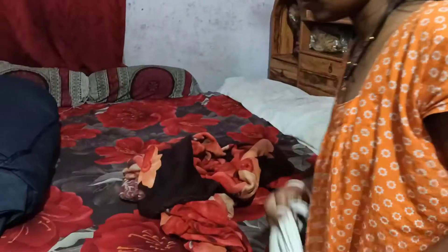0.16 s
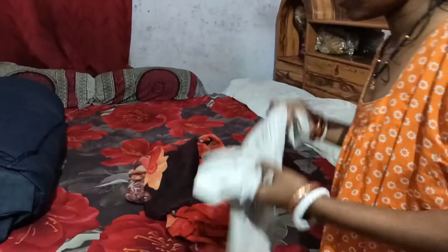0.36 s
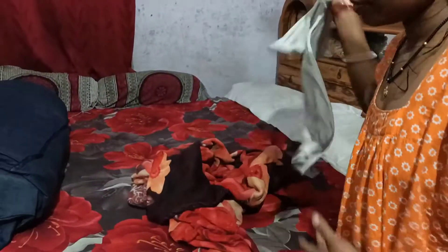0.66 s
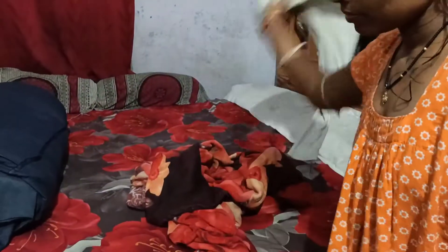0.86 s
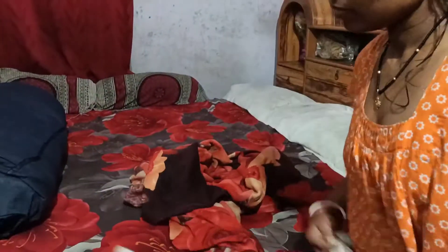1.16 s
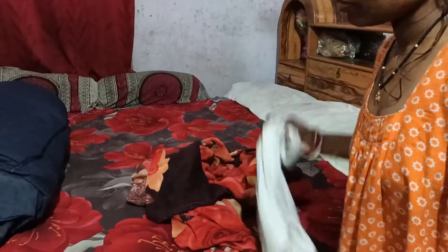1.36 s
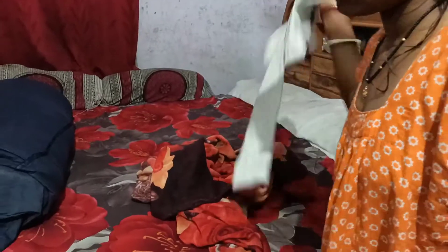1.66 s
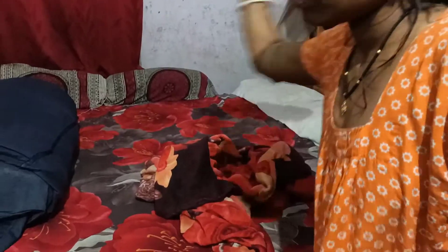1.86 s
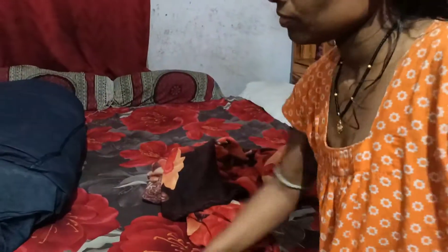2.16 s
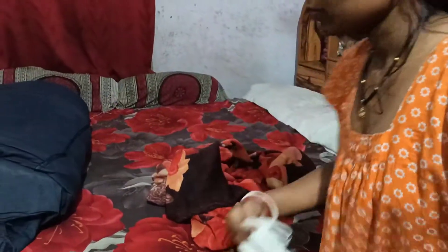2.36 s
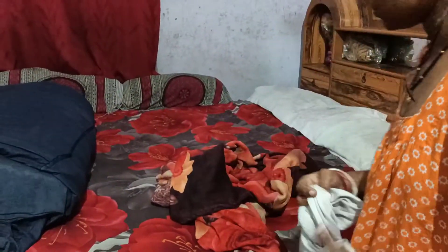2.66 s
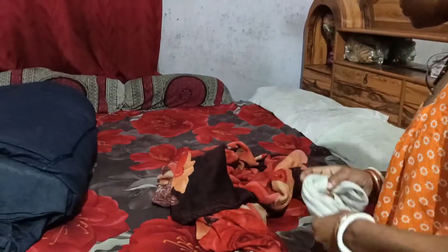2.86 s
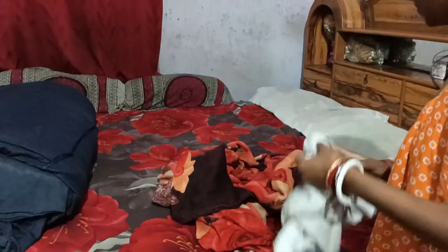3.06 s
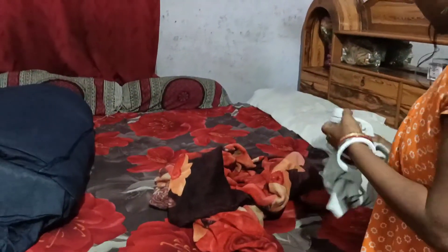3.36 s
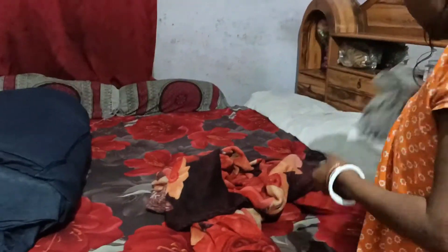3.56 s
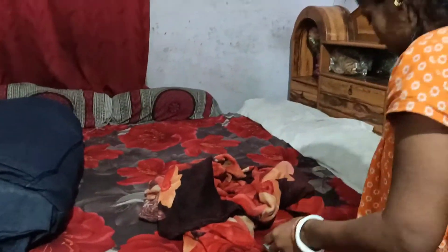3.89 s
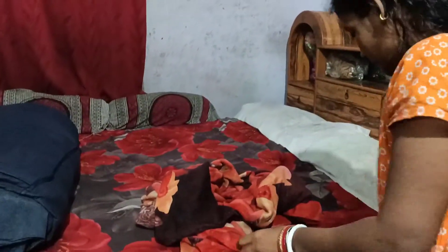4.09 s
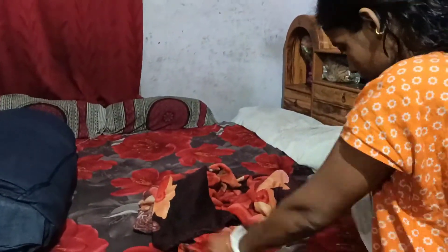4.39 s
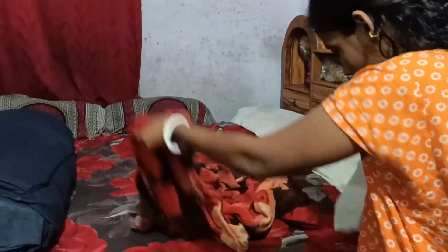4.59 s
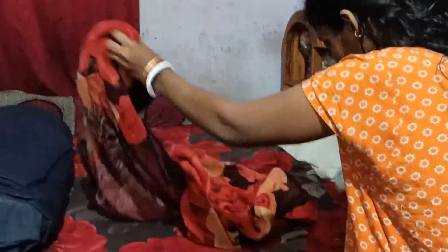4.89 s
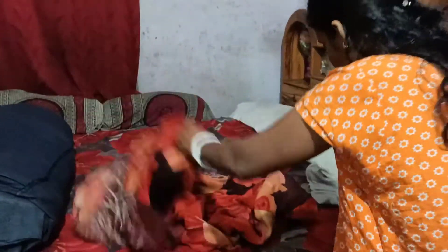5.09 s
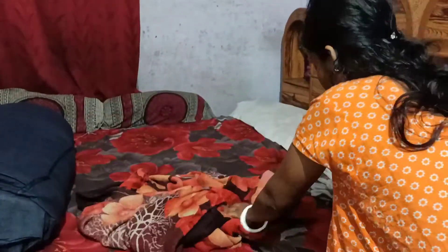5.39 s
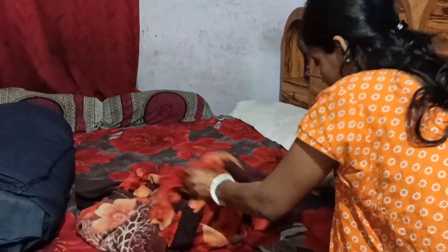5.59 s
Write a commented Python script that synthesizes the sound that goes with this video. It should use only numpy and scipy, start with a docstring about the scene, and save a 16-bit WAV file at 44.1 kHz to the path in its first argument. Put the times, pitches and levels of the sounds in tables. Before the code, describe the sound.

Cloth is snapped out three times with dull airy thumps, while bangles clink dryly on a wrist in a small, quiet bedroom.

```python
"""A push of air thumps as cloth is snapped out, then bangles of metal and shell clink on a wrist.
The cloth is snapped again and dropped on a bed in a small bedroom; it rustles, a far animal calls, the street hums.
Knocks are clicks into ringing modes, pushes of air are band-passed clicks that also ring the low room modes,
hum and rustle are banded noise, calls are a few harmonics; diffuse reflections are decaying noise.
Two microphone ports, each with treble resonances of its own."""
import sys
import numpy as np
from scipy import signal
from scipy.io import wavfile

SR = 44100
rng = np.random.default_rng(int(sys.argv[2]) if len(sys.argv) > 2 else 0)


def store_wav(level_fs):
    """Save 16-bit WAV to argv[1]."""
    pcm = np.round(np.clip(np.atleast_2d(level_fs), -1, 1) * 32767)
    wavfile.write(sys.argv[1], SR, pcm.T.astype(np.int16))


def boost_factor(decibels):
    """Convert a level in decibels to a linear amplitude factor."""
    exponent = np.asarray(decibels, float) / 20
    return 10 ** exponent


N = 253134  # samples

# edges of the noise bands, half an octave apart: (frequency [Hz])
NOISE_EDGES_HZ = 25 * 2 ** np.arange(0, 9.6, .5)
# correlation of the left and right noise: (frequency [Hz], correlation [-1..1])
LEFT_RIGHT_LIKENESS = [(60, 0.89), (130, 1), (290, 0.69), (640, 0.63), (1410, -.1), (3100, -0.28),
                       (15000, -0.61)]

# street hum spectrum: (frequency [Hz], relative density [dB])
HUM_SPECTRUM = [(15, -53), (25, -19.5), (92, 1), (217, -15.5), (293, -4.5), (373, -13.5), (405, -2),
                (624, -29), (1040, -20), (3920, -35.5), (4370, -41.5), (7110, -37), (7920, -51),
                (9570, -42), (16000, -68)]
# background level, heard to rise and dip: (time [s], level [dB])
BACKGROUND_LEVEL = [(0.0, -39), (0.17, -58), (0.67, -62.5), (0.97, -65.5), (1.23, -53.5), (1.49, -61),
                    (1.69, -63.5), (2.01, -65.5), (2.43, -56), (2.67, -67), (2.86, -62.5), (3.36, -61.5),
                    (3.68, -65), (4.3, -61), (5.2, -61.5), (5.35, -65), (5.61, -63), (5.74, -63)]
# low flapping of the cloth after each push of air; level relative to the boom
FLAP_DB, FLAP_T60_S, FLAP_RISE_S = -18, 0.28, 0.035

# far animal calls: (start [s], length [s], mid-call pitch [Hz], relative level [dB])
FAR_CALLS = [(1.95, 0.15, 230, -77), (2.85, .19, 226, -73.5), (5.55, 0.13, 230.6, -75.5)]
# harmonics of a call that carry: (multiple of the pitch, relative level [dB])
CALL_HARMONICS = [(2, -2), (3, -18), (4, 8), (5, -1), (6, -10), (9, -14.5), (10, -14.5)]
CALL_EDGE_S, CALL_SAG_HZ_PER_S, CALL_WOBBLE_HZ = 0.019, 16, 6.0

# cloth rustle spectrum: (frequency [Hz], relative density [dB])
RUSTLE_SPECTRUM = [(700, -24.5), (1500, -7), (2500, 1), (4000, -6.5), (8000, -1), (15500, 2)]
# cloth rustle in time: (time [s], level [dB])
RUSTLE_LEVEL = [(0, -62), (.16, -37), (.28, -86), (.52, -81), (.64, -92.5), (2.15, -89.5), (2.3, -58.5),
                (2.4, -73), (2.46, -47.5), (2.6, -95), (3.07, -85), (3.39, -72.5), (3.6, -88), (4.02, -77),
                (4.1, -46.5), (4.28, -62), (4.5, -66.5), (5.13, -68.5), (5.3, -89), (5.74, -95)]

# standing waves of the room: (frequency [Hz], relative level [dB], t60 [s])
ROOM_MODES = [(50.8, -8.5, 0.38), (132.7, -5.5, 0.18), (264, -7.5, 0.23), (321.8, -0.5, 0.13),
              (434.7, -9, 0.28), (549.4, -15, 0.25)]
# decay of the diffuse reflections: (frequency [Hz], t60 [s])
ROOM_T60 = [(40, 0.89), (280, 0.29), (740, 0.36), (1940, .28), (5120, 0.25), (13500, 0.19)]
# colour of the diffuse reflections: (frequency [Hz], relative level [dB])
ROOM_COLOUR = [(300, 12.5), (650, 1), (900, -0.5), (1300, 3.5), (2500, -4), (4000, -6), (8000, -2),
               (15000, -7.5)]

# air pushed by the cloth, relative levels:
# (time [s], boom [dB], thump [dB], snap [dB], hiss [dB])
PUFFS = [(.001, -20.5, -20.5, -19.5, -26.5), (0.061, -58, -63, -46, -55), (.44, -59, -58.5, -54.5, -67),
         (1.113, -56, -24.5, -23.5, -29), (1.1212, -23, -17, -12, -17), (1.129, -26, -22, -43, -36),
         (1.194, -32, -35.5, -32.5, -66), (1.475, -52, -49.5, -50, -68), (1.58, -58.5, -58, -54.5, -76.5),
         (2.237, -24.5, -25.5, -21.5, -20.5), (2.2524, -19.5, -11, -11, -30),
         (2.262, -24.5, -23, -33, -24.5), (2.46, -56, -48.5, -47.5, -60), (2.549, -53, -69, -65, -71),
         (4.086, -45, -44, -35.5, -38), (4.109, -45.5, -47.5, -58, -35), (4.137, -37, -36, -42, -65),
         (4.147, -35.5, -42, -60, -50), (4.382, -65.5, -65, -74, -64), (5.196, -65, -79, -69, -79.5)]
# edges of the boom, thump, snap and hiss bands: (frequency [Hz])
PUFF_EDGES_HZ = [30, 200, 700, 3500, 15000]

# ring modes of each bangle: (frequency [Hz], relative level [dB], t60 [s])
FIRST_METAL_MODES = [(3500, -8.5, 0.2), (5830, -5, 0.18), (8350, -4.5, 0.11), (10200, 5, 0.12),
                     (13610, 4.5, .18)]
SECOND_METAL_MODES = [(2870, -16.5, 0.077), (4420, -14.5, 0.15), (6725, -9, .15), (9090, 0, 0.084),
                      (12800, -14.5, .15), (15100, -1, .18)]
SHELL_MODES = [(2760, -32, 0.015), (4260, -30, 0.017), (5260, -28, 0.025), (6960, -19, 0.015),
               (8040, -19, 0.014), (9430, -15, 0.022), (9670, -24.5, 0.091), (9930, -17, 0.022),
               (11680, -14.5, 0.017), (12600, -17.5, 0.016), (14400, -20, .02)]
# bangles knocking together: (time [s], relative level [dB], lean to the left [dB])
KNOCKS = [(.0754, -40.5, -5.5), (0.1113, -24, -1), (.1393, -28.5, 0), (.183, -20, 2.5), (0.511, -61, -6),
          (1.0932, -37.5, 5), (1.1071, -18.5, -4.5), (1.3086, -46.5, -7), (1.3283, -56, 7),
          (1.475, -68, -7), (2.0505, -49.5, 0), (2.173, -40, 3.5), (2.2158, -17, 2), (2.4175, -32, -5.5),
          (2.439, -37.5, -1), (2.46, -42, -2), (2.4789, -27.5, -3), (2.5273, -36, 6), (2.8774, -47.5, -5),
          (2.9013, -45, -2), (3.1117, -59.5, -0.5), (3.2087, -53.5, -2), (3.256, -46.5, -2.5),
          (3.3756, -42, 1), (3.3852, -33.5, 4), (3.504, -43.5, 1), (3.743, -59.5, -4), (3.7777, -55, 4.5),
          (3.8515, -37, 0.5), (4.0415, -48.5, -2), (4.0477, -39, -1.5), (4.2353, -36.5, 5.5),
          (4.334, -47, 7), (4.365, -43, 3), (4.3811, -21.5, 3.5), (4.508, -50, 12), (4.5332, -36.5, 4),
          (4.566, -48, 6.5), (4.6071, -35.5, 5.5), (4.6593, -44.5, 6), (4.7197, -47.5, -1.5),
          (4.7733, -48, 3), (4.787, -35, 1.5), (4.8956, -55, 3.5), (4.923, -51.5, 7), (4.9774, -36.5, 4),
          (5.0717, -33.5, 6.5), (5.1712, -39, 3.5), (5.1958, -30.5, -1.5), (5.2109, -32, 2),
          (5.5283, -58, -1), (5.5634, -40, -4), (5.5777, -47.5, -2)]
# knocks after which the metal bangles ring on faintly:
# (time [s], first bangle relative level [dB], second bangle relative level [dB])
CHIMES = [(.1116, -53, -54), (.183, -58, -47), (2.4783, -62.5, -75), (3.3851, -62, -53),
          (3.8516, -62.5, -67.5), (4.2353, -64, -74), (4.365, -63, -49), (4.9779, -57.5, -58),
          (5.0717, -53.5, -75), (5.1954, -60, -75), (5.2109, -66, -59)]
TOUCHES_PER_KNOCK = 4
TOUCH_GAP_S, TOUCH_LOSS_DB = 0.004, 4.5  # mean gap; loss from one touch to the next

# port resonances and notches: (frequency [Hz], width [Hz], gain [dB])
LEFT_PORT = [(6500, 2500, -16), (9620, 2700, 12.5), (15300, 2000, -15.5)]
RIGHT_PORT = [(6940, 2000, 7.5), (10030, 880, -17.5), (15205, 1300, 19.5)]
TOP_CUT_HZ = 15900  # 40 dB down from here up


def rms_one(x):
    """Scale to rms 1."""
    return x / np.sqrt(np.mean(x ** 2) + 1e-20)


def at_hz(points, hz):
    """Read a table on a log-frequency axis."""
    table_hz, values = np.transpose(points)
    return np.interp(np.log(hz), np.log(table_hz), values)


def in_time(rows):
    """A level curve as gain per sample."""
    s, db = np.transpose(rows)
    return boost_factor(np.interp(np.arange(N) / SR, s, db))


def band(x, low_hz, high_hz):
    """Butterworth band-pass."""
    sos = signal.butter(2, [low_hz, high_hz], "band", fs=SR, output="sos")
    return signal.sosfilt(sos, x + 1e-18)


def drift(rate_hz):
    """Slow random wander of spread 1: noise through two equal low-pass poles."""
    hop = 40  # samples per slow step
    settle = 2000  # slow steps dropped while the filter settles
    r = np.exp(-2 * np.pi * rate_hz * hop / SR)
    noise = rng.standard_normal(N // hop + settle + 2)
    slow = signal.lfilter([1], [1, -2 * r, r * r], noise)[settle:]
    return np.interp(np.arange(N) / hop, np.arange(len(slow)), rms_one(slow))


def train(times_s, heights):
    """Clicks of given heights at given times."""
    out = np.zeros(N)
    np.add.at(out, np.round(np.asarray(times_s) * SR).astype(int), heights)
    return out


def stereo_train(times_s, db, lean_db):
    """Clicks at both ports, half of the lean added left and taken off right."""
    return np.array([train(times_s, boost_factor(db + side * lean_db / 2)) for side in (1, -1)])


def ring(clicks, hz, t60_s):
    """A unit click sets a decaying sine of starting height 1 ringing."""
    r, w = boost_factor(-60 / (t60_s * SR)), 2 * np.pi * hz / SR
    return signal.lfilter([0, np.sin(w)], [1, -2 * r * np.cos(w), r * r], clicks + 1e-18)


def stereo_bands(length):
    """Half-octave bands of white noise, alike left and right in the bass."""
    white = rng.standard_normal((2, 2, length))
    for k, (low_hz, high_hz) in enumerate(zip(NOISE_EDGES_HZ, NOISE_EDGES_HZ[1:])):
        mid, side = band(white[k % 2], low_hz, high_hz)  # neighbours use separate noise
        hz = np.sqrt(low_hz * high_hz)
        alike = np.clip(at_hz(LEFT_RIGHT_LIKENESS, hz), -1, 1)
        yield hz, np.sqrt(1 + alike) * mid + np.sqrt(1 - alike) * side * [[1], [-1]]


def banded_noise(spectrum, patchy_db):
    """Coloured stereo noise of rms 1; bands flicker partly together, partly alone."""
    together = drift(2.2)
    total = np.zeros((2, N))
    for hz, noise in stereo_bands(N):
        flicker_db = patchy_db * (1.3 * together + drift(8.2))
        total += boost_factor(at_hz(spectrum, hz) + flicker_db) * noise
    return rms_one(total)


def flapping():
    """Gain of the low flutter: it swells after each push of air and dies away."""
    s, boom_db = np.transpose(PUFFS)[:2]
    fall, rise = boost_factor(-60 / (FLAP_T60_S * SR)), np.exp(-1 / (FLAP_RISE_S * SR))
    dying = signal.lfilter([1], [1, -fall], train(s, boost_factor(boom_db + FLAP_DB)))
    return signal.lfilter([1 - rise], [1, -rise], dying)


def hum_and_flapping():
    """Street hum and cloth flutter: one low noise under the sum of their gains."""
    return (in_time(BACKGROUND_LEVEL) + flapping()) * banded_noise(HUM_SPECTRUM, patchy_db=2.0)


def far_calls():
    """Short hoarse calls of which a few harmonics carry; the pitch sags and wobbles."""
    t, out = np.arange(N) / SR, np.zeros(N)
    hoarseness = boost_factor(4.3 * drift(49.0))
    wobble_hz = CALL_WOBBLE_HZ * drift(30.3)
    for start_s, length_s, hz, db in FAR_CALLS:
        pitch_hz = hz - CALL_SAG_HZ_PER_S * (t - start_s - length_s / 2) + wobble_hz
        phase = 2 * np.pi * np.cumsum(pitch_hz) / SR
        inside_s = np.minimum(t - start_s, start_s + length_s - t)
        edges = np.clip(inside_s / CALL_EDGE_S, 0, 1)
        voice = sum(boost_factor(d) * np.sin(k * phase + k * k) for k, d in CALL_HARMONICS)
        out += edges * boost_factor(db) * voice
    return out * hoarseness


def cloth_rustle():
    """Friction of the cloth: patchy noise that follows a level curve."""
    return in_time(RUSTLE_LEVEL) * banded_noise(RUSTLE_SPECTRUM, patchy_db=4.5)


def room(x, build_s=0.0014):
    """Diffuse reflections: noise that builds up in a few ms and dies band by band."""
    t = np.arange(SR // 2) / SR
    tail = np.zeros((2, len(t)))
    for hz, noise in stereo_bands(len(t)):
        tail += boost_factor(at_hz(ROOM_COLOUR, hz) - 60 * t / at_hz(ROOM_T60, hz)) * noise
    tail *= 1 - np.exp(-(t / build_s) ** 2)
    return signal.fftconvolve(x, tail, axes=1)[:, :N]


def room_modes(push):
    """Standing waves of the room, neighbours opposed in sign; nearly the same at both ports."""
    out = np.zeros((2, N))
    for k, (hz, db, t60_s) in enumerate(ROOM_MODES):
        wave = (-1) ** k * boost_factor(db) * ring(push, hz, t60_s)
        lean = 0.25 * np.sin(k * 2.0) * np.sqrt(hz / 500)
        out += np.array([[1 + lean], [1 - lean]]) * wave
    return out


def puffs():
    """Pressure pulses: four bands of click trains, each scaled to a peak of 1 per unit click."""
    s, *levels = np.transpose(PUFFS)
    parts = []
    for low_hz, high_hz, db in zip(PUFF_EDGES_HZ, PUFF_EDGES_HZ[1:], levels):
        unit_peak = np.abs(band(train([0], 1.0), low_hz, high_hz)).max()
        parts.append(band(train(s, -boost_factor(db)), low_hz, high_hz) / unit_peak)
    return parts


def strike(s, db, lean_db, modes, spread_db):
    """Clicks strike every mode with a random strength, louder at one port or the other."""
    out = np.zeros((2, N))
    chance = rng.standard_normal((len(s), len(modes)))
    for (hz, level_db, t60_s), luck in zip(modes, chance.T):
        mode_db = db + level_db + spread_db * luck
        out += ring(stereo_train(s, mode_db, lean_db), hz, t60_s)
    return out


def bangles():
    """Each knock is a quick rattle of touches on the shell bangle; after some the metal ones ring on faintly."""
    start_s, knock_db, lean = np.transpose(KNOCKS)
    touch = np.arange(TOUCHES_PER_KNOCK)
    gaps_s = TOUCH_GAP_S * rng.exponential(1, (len(start_s), TOUCHES_PER_KNOCK))
    gaps_s *= touch > 0  # the first touch falls on the knock
    s = (start_s[:, None] + np.cumsum(gaps_s, axis=1)).ravel()
    db = (knock_db[:, None] - TOUCH_LOSS_DB * touch).ravel()
    lean_db = np.repeat(lean, TOUCHES_PER_KNOCK)

    clicks = band(stereo_train(s, db + 6.0, lean_db), 2500, 18000)
    shell = boost_factor(-3.0) * strike(s, db, lean_db, SHELL_MODES, spread_db=5.5)
    chime_s, first_db, second_db = np.transpose(CHIMES)
    first = strike(chime_s, first_db, 0, FIRST_METAL_MODES, spread_db=3.5)
    second = strike(chime_s, second_db, 0, SECOND_METAL_MODES, spread_db=3.5)
    return clicks + shell + first + second


def scene():
    """Bangles and puffs, direct and through the room, over rustle, hum and far calls."""
    background = hum_and_flapping() + far_calls() + cloth_rustle()
    boom, thump, snap, hiss = puffs()
    clinks = bangles()
    direct = clinks + boost_factor(3.0) * (boom + thump) + snap + hiss
    reflected = room(boost_factor(-25.5) * clinks + boost_factor(-16.5) * (snap + hiss) + boost_factor(-29) * thump)
    standing = boost_factor(-29) * room_modes(boom + thump)
    return background + direct + reflected + standing


def port(x, peaks):
    """Resonances and notches of one microphone port: a chain of peaking filters."""
    for hz, width_hz, db in peaks:
        w, g = 2 * np.pi * hz / SR, boost_factor(db / 2)
        a = np.sin(w) * width_hz / (2 * hz)
        middle = -2 * np.cos(w)
        x = signal.lfilter([1 + a * g, middle, 1 - a * g], [1 + a / g, middle, 1 - a / g], x)
    return x


def band_limit(x):
    """A steep low-pass at the top of the band."""
    return signal.sosfilt(signal.butter(12, 16510, fs=SR, output="sos"), x)


def record(dry):
    """Port colour on each side, then a steep top cut."""
    ports = np.array([port(dry[0], LEFT_PORT), port(dry[1], RIGHT_PORT)])
    top_cut = signal.cheby2(10, 40, TOP_CUT_HZ, fs=SR, output="sos")
    mix = signal.sosfilt(top_cut, ports)
    return band_limit(mix)


dry = scene()
out = record(dry)
store_wav(out)
```